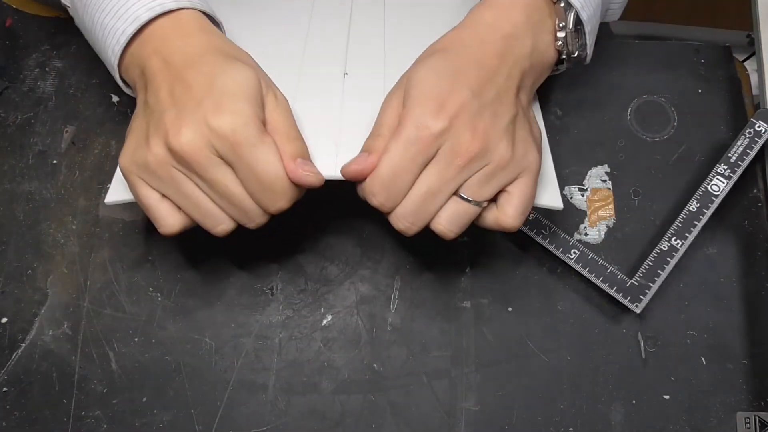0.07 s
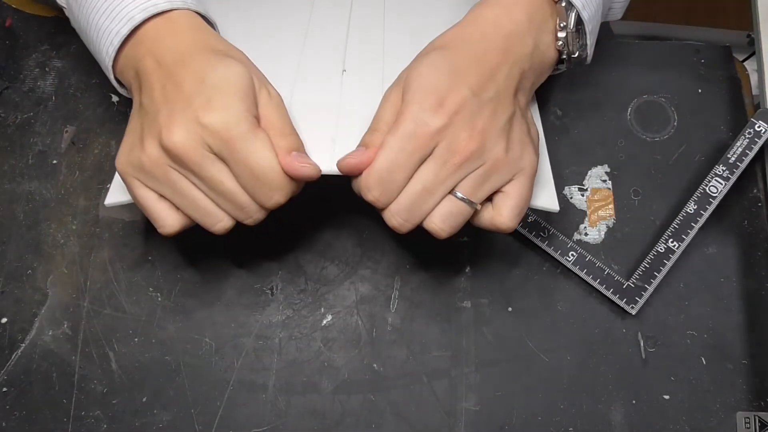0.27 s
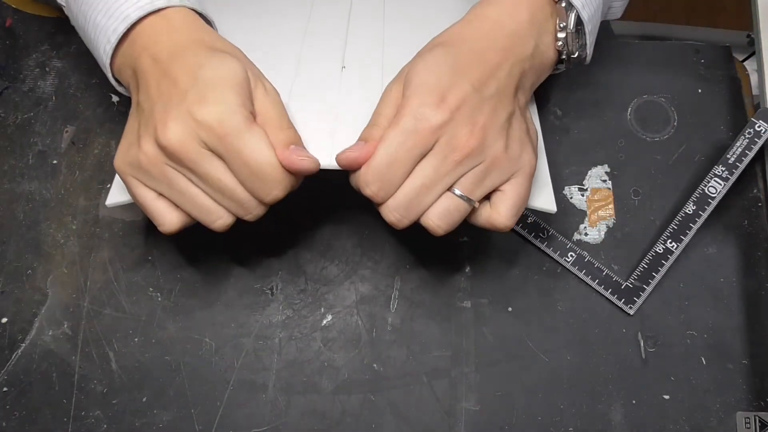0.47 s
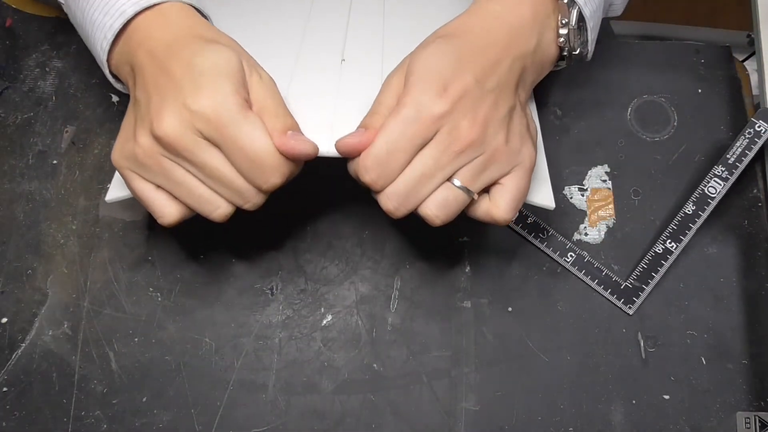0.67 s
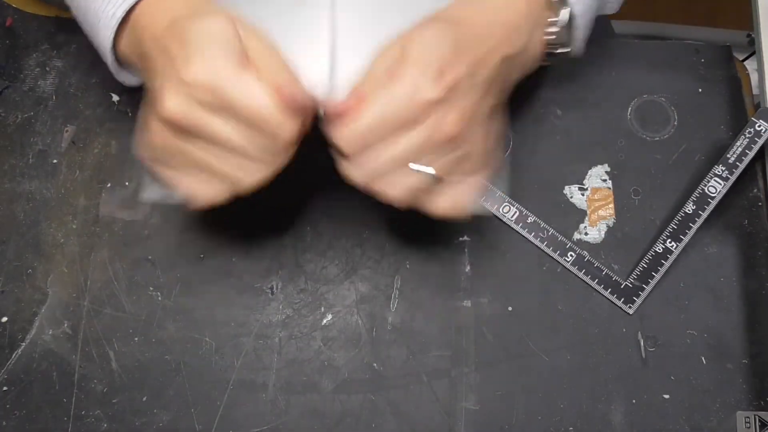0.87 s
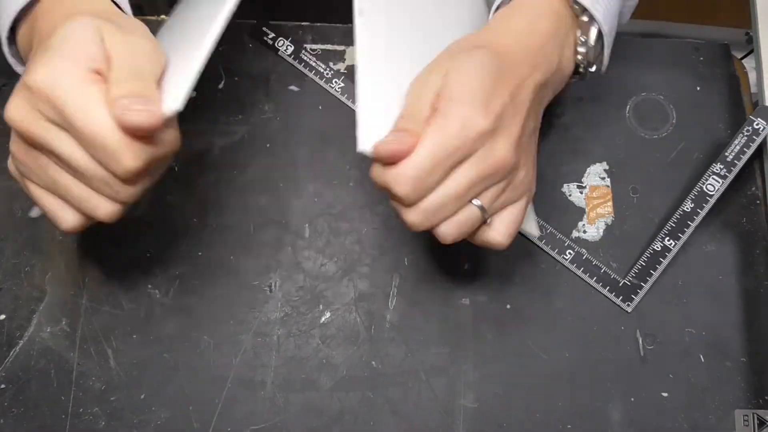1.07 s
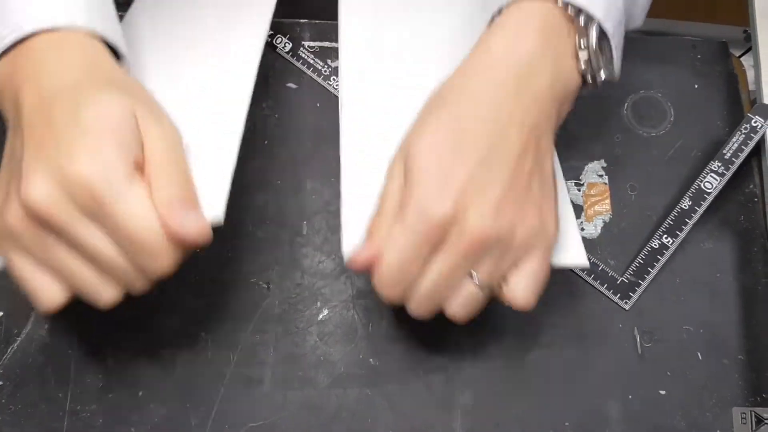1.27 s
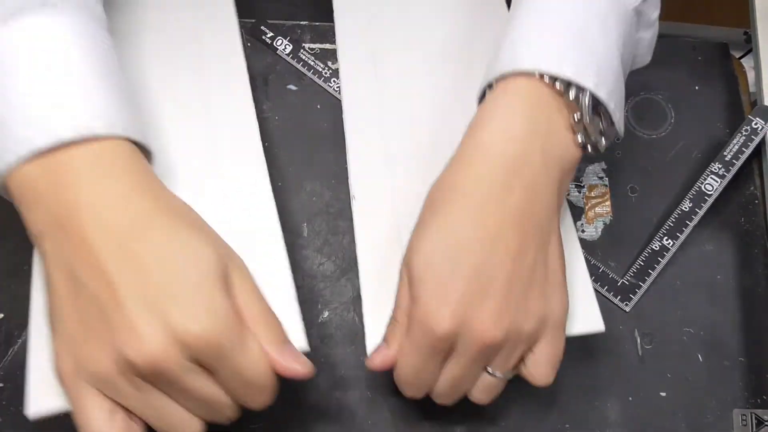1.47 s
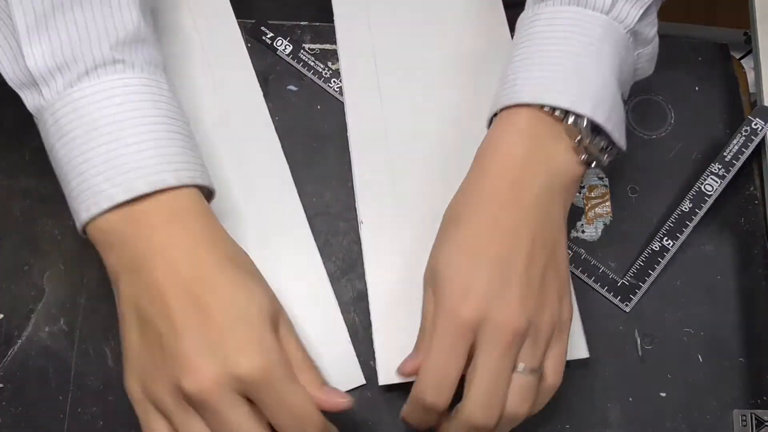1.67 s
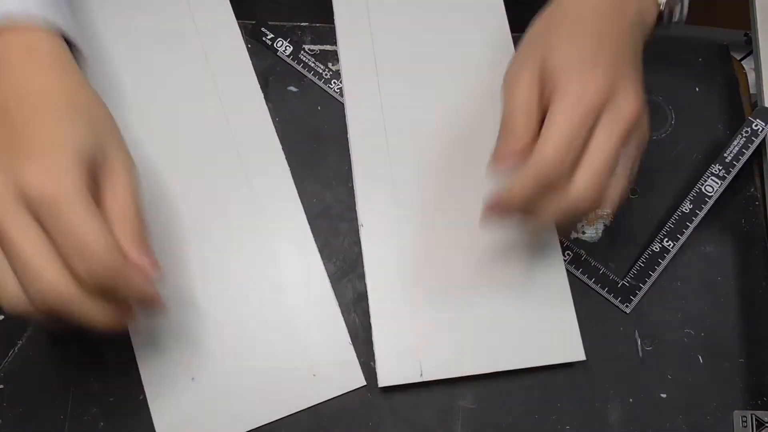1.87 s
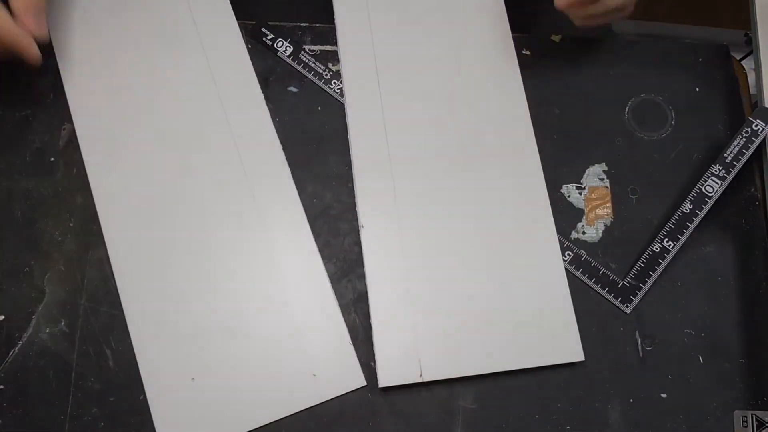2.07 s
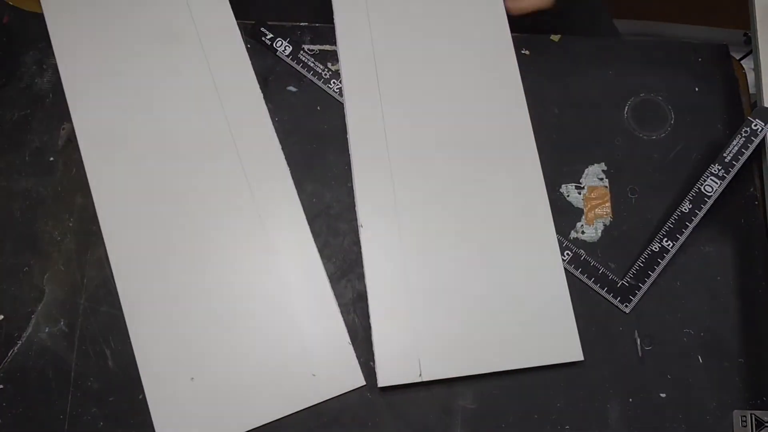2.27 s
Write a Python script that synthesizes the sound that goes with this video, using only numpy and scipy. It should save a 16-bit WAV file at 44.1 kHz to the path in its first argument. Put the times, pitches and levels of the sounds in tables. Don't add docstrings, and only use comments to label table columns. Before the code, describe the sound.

A scored plastic sheet is snapped by hand, close in stereo in a small quiet room with faint hum. Sharp knocks on the table open it, with soft ticks near 0.4 and 0.75 seconds. At 1.06 a bright, dry burst of cracks breaks it. Gritty sliding and light taps follow from 1.35, a thud at 1.9, then the halves clatter on a steel square to the end.

```python
import sys
import numpy as np
from scipy import signal
from scipy.fft import rfft, irfft
from scipy.io import wavfile
from scipy.ndimage import uniform_filter1d

SR = 44100
rng = np.random.default_rng(int(sys.argv[2]) if len(sys.argv) > 2 else 0)


def invert_db(x):
    u = np.asarray(x, float) / 20
    return 10 ** u


def dump_mix(stems):
    frames = np.atleast_2d(stems).T
    limited = np.clip(frames, -1, 1)
    pcm = np.round(limited * 32767).astype(np.int16)
    wavfile.write(sys.argv[1], SR, pcm)


N = 101826
SIDE_DB = -11.5


def level(x, db):
    return x * invert_db(db) / np.sqrt(np.mean(x ** 2))


def colour(x, points):
    hz, db = np.array(points).T
    size = x.shape[-1]
    f = np.maximum(np.arange(size // 2 + 1) * SR / size, 1)
    return irfft(rfft(x) * invert_db(np.interp(np.log(f), np.log(hz), db)), size)


def pair(size):
    mid, side = rng.standard_normal((2, size))
    return mid + invert_db(SIDE_DB + 6.0) * side * np.array([[1], [-1]])


def walk(rate_hz):
    k = int(SR / rate_hz)
    steps = np.repeat(rng.standard_normal(N // k + 1), k)
    return 0.59 * uniform_filter1d(steps, k)[:N]


def hum_band(pitch_hz, sharpness):
    return signal.lfilter(*signal.iirpeak(pitch_hz, sharpness, fs=SR), pair(N))


# pitch_hz [Hz], level_db [dB per Hz]
AIR_COLOUR = [(20, -5.5), (90, -3.5), (187, -3), (400, -14), (900, -17), (1900, -30.5), (6000, -35.5),
              (9000, -29.5), (16000, -28)]


def air():
    hum_hz, hum_width_hz = 387, 45
    hum = hum_band(hum_hz, hum_hz / hum_width_hz)
    hiss = level(colour(pair(N), AIR_COLOUR), -68.5)
    return hiss * invert_db(0.5 * walk(21.0)) + level(hum, -68)


def room(x):
    t60_s, top_hz, echo_db = 0.22, 7000, -20
    t = np.arange(SR // 3) / SR
    echo = rng.standard_normal((2, len(t))) * invert_db(-60 * t / t60_s)
    echo = echo * (t > .004)
    echo = signal.lfilter(*signal.butter(1, top_hz, fs=SR), echo)
    echo = echo * invert_db(echo_db) / np.sqrt(np.sum(echo ** 2) / 2)
    return signal.fftconvolve(x.mean(0)[None], echo)[:, :N]


# start_s [s], level_db [dB]
DRAG_LEVELS = [(1.101, -63), (1.219, -59.5), (1.33, -75), (1.36, -65), (1.401, -56.5), (1.426, -88),
               (1.48, -71.5), (1.581, -82), (1.599, -59), (1.69, -59.5), (1.781, -55.5), (1.81, -62),
               (1.85, -53), (1.885, -64.5), (1.961, -59), (2.08, -73), (2.31, -66)]
# pitch_hz [Hz], level_db [dB per Hz]
DRAG_COLOUR = [(70, -22), (140, -8.5), (350, 0.5), (700, -9), (1430, -9.5), (2500, -18.5), (6000, -22),
               (9500, -17), (13500, -19), (16000, -39)]


def slide():
    s, db = np.array(DRAG_LEVELS).T
    t = np.arange(N) / SR
    hands = np.interp(t, s, db, left=-120)
    drag = hands + 2.0 * walk(39.83) + 0.5 * walk(370)
    return level(colour(pair(N), DRAG_COLOUR), 2.0) * invert_db(drag)


def ring(modes, push, t, db):
    hz, mode_db, t60 = np.array(modes).T[:, :, None]
    uneven, detune, side, phase = rng.standard_normal((4, len(modes), 1))
    decay_db = mode_db + 4 * uneven - 60 * t / np.maximum(t60, .004)
    wave = invert_db(decay_db) * np.sin(2 * np.pi * hz * (1 + 0.01 * detune) * t)
    mid = (np.sign(0.6 + phase) * wave).sum(0)
    both = mid + invert_db(SIDE_DB) * (side * wave).sum(0) * np.array([[1], [-1]])
    both = signal.fftconvolve(both, push[None])[:, :len(t)]
    return both * invert_db(db) / np.sqrt(np.mean(both[:, :SR // 80] ** 2))


# start_s [s], level_db [dB], pitch_hz [Hz], t60_s [s]
BUMPS = [(0.046, -47.5, 138, 0.35), (.443, -46, 380, 0.033), (.744, -51.5, 496, .16), (.76, -65, 130, 0.2),
         (0.79, -50, 409, 0.1), (1.143, -50, 855, 0.44), (1.590, -40.5, 460, 0.045),
         (1.599, -53, 293, 0.13), (1.603, -48.5, 88.5, 0.35), (1.908, -33, 197, 0.047),
         (2.051, -50.5, 325, 0.26), (2.186, -47.5, 162.6, 0.42)]


def thumps():
    out, t = np.zeros((2, N + SR // 4)), np.arange(SR // 4) / SR
    for s, db, hz, t60 in BUMPS:
        modes = [(hz * k, 0, t60) for k in (.75, .95, 1.1, 1.35)]
        push = t * np.exp(-t * hz * 8)
        i = int(s * SR)
        out[:, i:i + len(t)] += ring(modes, push, t, db)
    return out[:, :N]


# pitch_hz [Hz], level_db [dB], t60_s [s]
STEEL_LOW_NOTES = [(1439.4, 2, 0.083), (1486, 0, 0.069), (1997, -9.5, 0.036)]
STEEL_HIGH_NOTES = [(3563, -9.5, 0.049), (5245, -2.5, 0.023), (7900, 6, 0.006), (9350, -2.5, 0.01),
                    (10670, 5.5, 0.0072), (12000, -16, 0.006)]


def steel_buzz():
    buzz = hum_band(STEEL_LOW_NOTES[0][0], 18)
    buzz = buzz + invert_db(-4) * hum_band(STEEL_HIGH_NOTES[0][0], 18)
    touching = np.arange(N) / SR > 1.92
    return level(buzz, -60.5) * invert_db(4.9 * walk(70)) * touching


def crowd(points, t60, count):
    hz, db = np.array(points).T
    place, life = rng.random((2, count))
    f = hz[0] * (hz[-1] / hz[0]) ** ((np.arange(count) + place) / count)
    mode_t60 = t60 * (1.05 + 0.57 * life) * (hz[0] * 2.38 / f) ** 0.67
    return np.array([f, np.interp(np.log(f), np.log(hz), db), mode_t60]).T


def contacts(rows, crack, body, t60, table, clear_notes=(), grain_db=0):
    crest_db, tail_db, tail_t60_s = -8, -19, 0.18
    out, t = np.zeros((2, N + SR // 5)), np.arange(SR // 5) / SR
    for s, crack_db, ring_db, thud_db, ms in rows:
        ms = max(ms, .5)
        hiss_db = crack_db + crest_db
        rise = 1 - np.exp(-t / (0.0015 * (ms / 3) ** 2))
        clumps = np.repeat(rng.standard_normal(len(t) // 16 + 1), 16)[:len(t)]
        grit = rise * np.exp(-1000 * t / ms) * rng.standard_normal(len(t)) * invert_db(grain_db * clumps)
        grit[8] += invert_db(13) * min(3 / ms, 1) ** 2
        hiss = level(colour(pair(len(t)), crack), hiss_db)
        grain = uniform_filter1d(np.abs(grit), 32)
        tail = invert_db(tail_db - 60 * t / tail_t60_s) * rise
        hit = hiss * (grain / grain.max() + tail)
        strike = grit * np.exp(-1000 * t / (ms * 0.44))
        hit = hit + ring(crowd(body, t60, count=48), strike, t, ring_db)
        push = t * np.exp(-t / (0.0013 * 0.08 * ms))
        hit = hit + ring(crowd(table, 0.11, count=16), push, t, thud_db)
        for modes, on_crack, db in clear_notes:
            hit = hit + ring(modes, strike, t, db + (hiss_db if on_crack else ring_db))
        i = max(int(s * SR), 0)
        out[:, i:i + len(t)] += hit
    return out[:, :N]


# start_s [s], crack_db [dB peak], sheet_ring_db [dB], table_thud_db [dB], contact_ms [ms]
SHEET_KNOCKS = [(0.0004, -47, -53.5, -42.5, 5.5), (0.0172, -38, -47, -38, 3.1),
                (0.0196, -21, -35.5, -43, 2.9), (0.03, -35, -42.5, -64, 8.3),
                (0.0415, -24.5, -36.5, -37, 3.9), (0.0505, -33.5, -37.5, -41.5, 4),
                (0.0964, -55, -51, -63, 2.6), (0.1274, -54.5, -68, -62, 2.3),
                (0.1522, -51.5, -55, -50, 8.7), (0.207, -60.5, -62.5, -56, 4.6),
                (0.2364, -59.5, -57, -57.5, 3.4), (0.3634, -67, -69.5, -91, 3.5),
                (0.4315, -44.5, -63.5, -67, 6.1), (0.4385, -41, -47.5, -46.5, 3.2),
                (0.7392, -38, -44, -49.5, 3.1), (0.757, -57, -46.5, -41.5, 3.9),
                (0.7872, -45, -46.5, -50.5, 1.75), (0.799, -52, -50.5, -47, 3),
                (0.8325, -65, -64, -57, 7.1), (0.9033, -65.5, -79, -65, 2.7), (0.993, -71, -84, -60, 4.5)]
# pitch_hz [Hz], level_db [dB per Hz]
CRACK_COLOUR = [(1200, -1.5), (2200, -3.5), (4100, -1), (6000, -5.5), (8000, -2.5), (11000, -5),
                (14000, -10), (16500, -22.5)]
TICK_COLOUR = [(1200, -12), (2200, -6), (2900, -12), (3450, -3), (4200, -11.5), (7700, -7), (14000, -12),
               (16200, -34)]
# pitch_hz [Hz], level_db [dB]
FLAT_BODY = [(300, -15.5), (420, -2), (700, 6), (1000, 0.5), (1430, 4), (2400, 1.5)]
BENT_BODY = [(350, -7.5), (480, -8.5), (700, 0), (1000, -2), (1400, -3.5), (2200, -11), (2800, -43)]
TABLE_BODY = [(110, 2), (150, 6), (230, -11), (340, 5), (450, 9.5), (620, -28)]
# pitch_hz [Hz], level_db [dB], t60_s [s]
STIFF_NOTES = [(2320, -2, 0.037), (3326, -2.5, .04), (3660, -8, .02)]


def knocks():
    t60_s, flat_count = 0.089, 6
    flat = contacts(SHEET_KNOCKS[:flat_count], CRACK_COLOUR, FLAT_BODY, t60_s, TABLE_BODY, grain_db=3.5)
    bent = contacts(SHEET_KNOCKS[flat_count:], TICK_COLOUR, BENT_BODY, t60_s, TABLE_BODY,
                    [(STIFF_NOTES, True, -8.5)], grain_db=6.5)
    return flat + bent


# start_s [s], crack_db [dB peak], half_ring_db [dB], table_thud_db [dB], contact_ms [ms]
HALF_LANDINGS = [
    (1.3456, -34, -43, -65, 2.75),
    (1.358, -41, -51.5, -55, 2.9),
    (1.478, -54, -65.5, -84, 3.4),
    (1.59, -31, -47, -49.5, 2.15),
    (1.6782, -57, -59, -50, 7.8),
    (1.7099, -30, -41.5, -45.5, 2.16),
    (1.7644, -45, -57, -58, 3.2),
    (1.818, -55, -53, -54, 3.7),
    (1.842, -38.5, -62, -58, 9.2),
    (1.9095, -43, -48, -41, 4.7),
]
# pitch_hz [Hz], level_db [dB]
HALF_BODY = [(600, -16), (950, -3), (1350, 0), (1650, -3), (1970, 2.5), (2600, -13), (3500, 2.5),
             (4200, -32)]


def landings():
    return contacts(HALF_LANDINGS, CRACK_COLOUR, HALF_BODY, 0.044, TABLE_BODY, grain_db=4.5)


# start_s [s], crack_db [dB peak], steel_ring_db [dB], table_thud_db [dB], contact_ms [ms]
STEEL_HITS = [(1.9279, -17, -36, -48, 1.5), (1.9472, -22, -51, -69, 0.68), (1.9515, -26.5, -51, -63, 3.7),
              (1.96, -42.5, -51, -49, 5), (1.9692, -43, -48, -49, 3.6), (1.9929, -34, -46, -70, 2.7),
              (2.0, -46, -52, -55, 4.5), (2.0092, -37, -47, -49, 4.2), (2.0445, -40, -50, -46.5, 3.6),
              (2.0495, -32, -50, -46.5, 4.6), (2.0949, -37, -52, -44, 3.1), (2.1268, -28, -37.5, -51, 2.5),
              (2.132, -27.5, -44, -47.5, 3.1), (2.1389, -43, -47, -48, 2.9), (2.1505, -61, -49, -44, 2.2),
              (2.1732, -34, -39.5, -65, 1.5), (2.1772, -25, -48.5, -55, 3.9), (2.1812, -26, -46, -53, 2.6),
              (2.186, -28.5, -40, -39.5, 4.9), (2.193, -42.5, -55, -40.5, 3.2),
              (2.2036, -49, -52, -42.5, 2.9), (2.2085, -44, -50, -50, 3.5), (2.2255, -61, -54, -52, 3.5),
              (2.235, -30, -40, -51, 2.2), (2.2426, -44, -42, -79, 2.6), (2.266, -36.5, -52, -51, 2.85),
              (2.2903, -56, -50, -64, 2)]
# pitch_hz [Hz], level_db [dB per Hz]
CLATTER_COLOUR = [(1200, -4), (2200, -3), (4100, -7), (5400, -6), (6500, -4.5), (10500, 0), (13500, -10.5),
                  (16000, -34.5)]
# pitch_hz [Hz], level_db [dB]
STEEL_BODY = [(700, -19.5), (1200, -14), (1460, 3), (1700, -11.5), (2050, -6.5), (2700, -11.5), (3600, -8),
              (5300, -8), (6500, -31)]
COVERED_TABLE = [(110, 1.5), (155, 3), (230, -7), (340, 8), (430, -8.5), (620, -9)]


def rattle():
    steel = [(STEEL_HIGH_NOTES, True, -7.5), (STEEL_LOW_NOTES, False, -3.5)]
    return contacts(STEEL_HITS, CLATTER_COLOUR, STEEL_BODY, 0.082, COVERED_TABLE, steel, grain_db=6)


# start_s [s], crack_db [dB peak], sheet_ring_db [dB], table_thud_db [dB], contact_ms [ms]
FRACTURES = [(1.0605, -13.5, -30, -40, 2.6), (1.0645, -14, -32.5, -63, 2), (1.069, -30, -47, -60, 12),
             (1.077, -22, -41, -57, 6.5), (1.0835, -17.5, -39, -65, 2.7), (1.0885, -21, -33.5, -53, 5.4),
             (1.0945, -25, -35.5, -52, 6.3), (1.104, -31, -51, -51, 6.5), (1.1204, -35, -63, -80, 6.6),
             (1.1424, -37.5, -45, -81, 4.4), (1.1518, -29, -46, -52, 1.8), (1.1604, -35, -41, -70, 6.1),
             (1.2044, -45.5, -53.5, -47.5, 5), (1.2314, -47, -67, -62, 1.8), (1.2595, -46.5, -60, -62, 3.6),
             (1.297, -48, -58, -52.5, 4.7)]
# pitch_hz [Hz], level_db [dB per Hz]
TEAR_COLOUR = [(1200, -0.5), (2000, -8.5), (3600, -6.5), (6200, -10), (8500, -6), (11000, -3.5),
               (14000, -9), (16500, -18)]
# pitch_hz [Hz], level_db [dB]
SHEET_BODY = [(620, -20), (800, 7.5), (1050, 2.5), (1350, 6), (1700, -7), (2000, -2.5), (2800, -29.5)]


def snap():
    return contacts(FRACTURES, TEAR_COLOUR, SHEET_BODY, 0.054, TABLE_BODY, grain_db=0.0)


def scene():
    near = slide() + thumps() + steel_buzz() + knocks() + landings() + rattle() + snap()
    low_cut = signal.butter(2, 189, "high", fs=SR, output="sos")
    near = signal.sosfilt(low_cut, near)
    return near + room(near) + air()


def roll_off(x):
    return signal.sosfilt(signal.butter(12, 16710, fs=SR, output="sos"), x)


def record(dry):
    tilt_db, top_hz = 1, 15640
    bass = signal.lfilter(*signal.butter(1, 500, fs=SR), dry)
    mix = dry + bass * (invert_db(np.array([[-tilt_db], [tilt_db]])) - 1)
    mix = signal.sosfilt(signal.butter(14, top_hz, fs=SR, output="sos"), mix)
    return roll_off(mix)


dry = scene()
out = record(dry)
dump_mix(out)
```